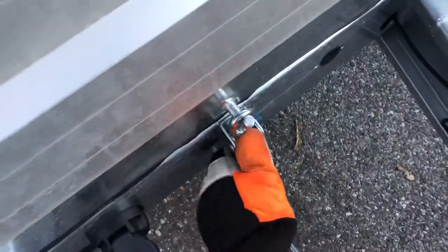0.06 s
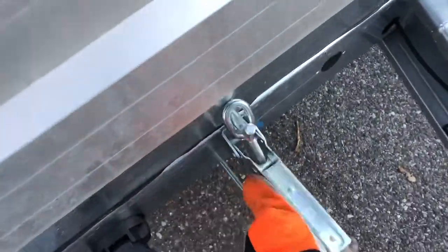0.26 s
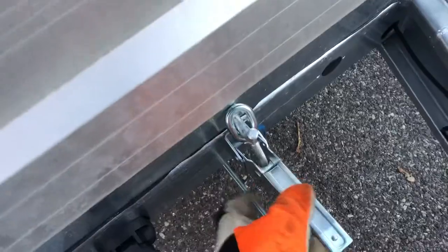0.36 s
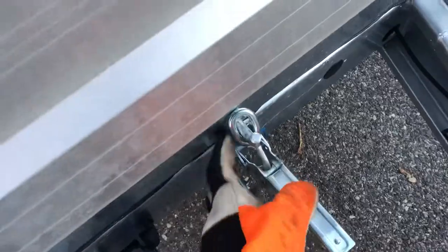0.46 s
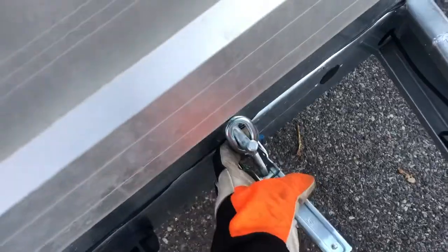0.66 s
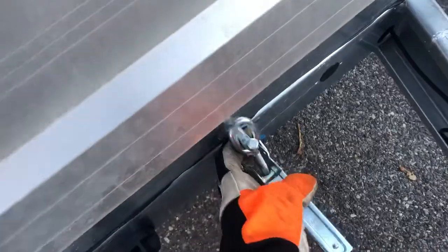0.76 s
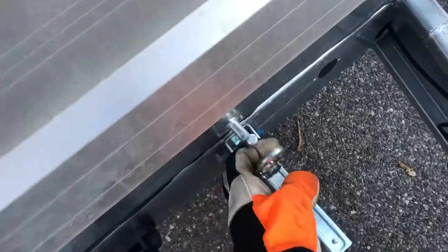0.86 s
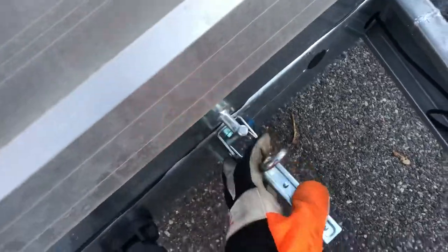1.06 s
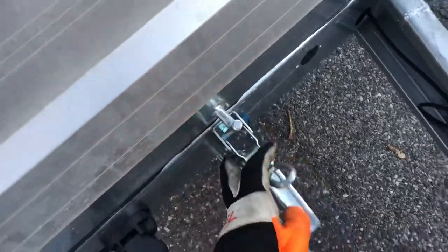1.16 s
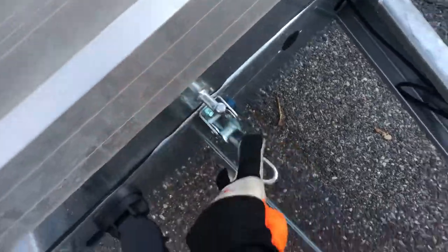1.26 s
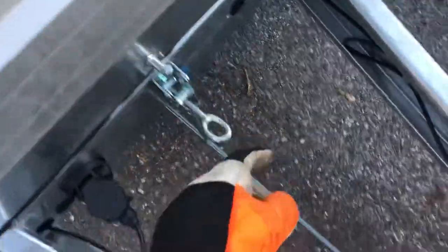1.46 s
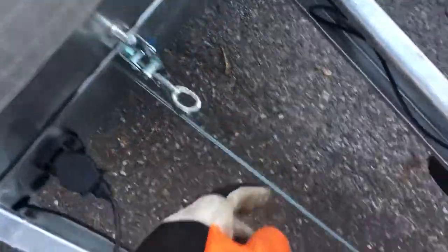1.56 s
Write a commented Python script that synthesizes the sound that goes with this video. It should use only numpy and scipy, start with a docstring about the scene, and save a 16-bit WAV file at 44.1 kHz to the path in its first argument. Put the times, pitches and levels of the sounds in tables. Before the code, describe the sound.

A steel trailer latch snaps open with two loud clanks. After a pause it rattles off its hook, clacks again and drops against the frame. Brief scrapes and soft glove rubbing come between, close by over low outdoor rumble.

```python
"""Over a low outdoor rumble, a steel lever snaps open: a gloved hand undoes a trailer's latch close by.
The over-centre latch's eye knocks on its catch, its shank judders off the hook, and it drops on the frame.
Each blow gives a dense clang and rings both the struck part and the trailer's side.
Steel scrapes around the blows and the glove rubs in between, both as noise from many tiny slips."""
import sys
import numpy as np
from scipy import signal
from scipy.fft import rfft, irfft
from scipy.io import wavfile
from scipy.ndimage import uniform_filter1d

SR = 44100
rng = np.random.default_rng(int(sys.argv[2]) if len(sys.argv) > 2 else 0)


def to_wav(s):
    """Save 16-bit WAV."""
    ch = np.atleast_2d(s).T  # columns
    pcm = np.round(np.clip(ch, -1, 1) * 32767)  # PCM
    wavfile.write(sys.argv[1], SR, pcm.astype(np.int16))


N = 70560


def amp(db):
    """Decibels to gain."""
    return 10 ** (np.asarray(db) / 20)


def unit_rms(x):
    """Scales to rms 1."""
    return x / np.sqrt(np.mean(abs(x) ** 2) + 1e-20)


def lookup(table, hz):
    """Interpolates a table on a log-frequency axis."""
    table_hz, values = np.transpose(table)
    return np.interp(np.log(hz + 1), np.log(table_hz + 1), values)


def colour(x, spectrum):
    """Filters by a spectrum table; output at rms 1."""
    gain = amp(lookup(spectrum, np.fft.rfftfreq(len(x), 1 / SR)))
    return unit_rms(irfft(rfft(x) * gain, len(x)))


# air and rumble spectra (frequency [Hz], relative density [dB])
AIR_SPECTRUM = [(25, -50), (60, -16), (120, -2.5), (200, -0.5), (300, -8.5), (500, -22), (1000, -22.5),
                (2000, -31.5), (4000, -44.5), (8000, -49.5), (15500, -53)]
RUMBLE_SPECTRUM = [(22, -58.5), (32, -20), (45, -4), (65, -8), (120, -33), (1000, -86)]
# rumble envelope (time [s], relative level [dB])
RUMBLE_SWELL = [(0, -16), (.25, -5.5), (.9, 0.5), (1.0, 7), (1.12, 3.5), (1.25, -4.5), (1.499, 3.5),
                (1.6, -0.5)]

def outdoors(air_db=-43.5, rumble_db=-50):
    """Steady open air and a deep, swelling rumble."""
    swell_db = np.interp(np.arange(N) / SR, *np.transpose(RUMBLE_SWELL))
    air = amp(air_db) * colour(rng.standard_normal(N), AIR_SPECTRUM)
    rumble = amp(rumble_db + swell_db) * colour(rng.standard_normal(N), RUMBLE_SPECTRUM)
    return air + rumble


def friction(strokes, spectrum, slips_per_s, spread_db, slip_s=0.00071):
    """Tiny uneven slips, each a puff of noise, in strokes that swell and fade."""
    t = np.arange(N) / SR
    onsets = rng.random(N) < slips_per_s / SR
    slips = onsets * amp(spread_db * np.minimum(rng.exponential(1, N), 3))
    slip_power = signal.lfilter([1], [1, -np.exp(-1 / (slip_s * SR))], slips ** 2)
    envelope = sum(amp(db) * np.sin(np.pi / 2 * np.interp(t, [start, peak, end], [0, 1, 0])) ** 2
                   for start, peak, end, db in strokes)
    return envelope * colour(np.sqrt(slip_power) * rng.standard_normal(N), spectrum)


# glove strokes (start [s], peak [s], end [s], level [dB])
GLOVE_STROKES = [(.53, .645, .80, -46), (1.06, 1.12, 1.47, -51), (1.15, 1.25, 1.48, -42.5)]
# rub spectrum (frequency [Hz], relative density [dB])
GLOVE_SPECTRUM = [(200, 3), (600, 1.5), (1400, -10), (2600, -14.5), (7000, -22.5), (10000, -29),
                  (15500, -29.5)]

def glove_rubs():
    """Glove on the latch: dense slips blur into a soft rustle."""
    return friction(GLOVE_STROKES, GLOVE_SPECTRUM, slips_per_s=6300, spread_db=3.5)


# steel strokes (start [s], peak [s], end [s], level [dB])
STEEL_STROKES = [(.185, .206, 0.29, -28), (.32, .37, 0.35, -31.5), (.828, .886, 0.94, -36)]
# scrape spectrum (frequency [Hz], relative density [dB])
STEEL_SPECTRUM = [(60, -34), (150, -17), (400, -6.5), (850, -8), (1600, -11.5), (3200, -20.5), (5500, -36),
                  (8000, -31.5), (11000, -53), (15500, -56)]

def steel_scrapes():
    """Steel sliding on steel: sparser slips sound gritty."""
    return friction(STEEL_STROKES, STEEL_SPECTRUM, slips_per_s=1400, spread_db=1.0)


def attack(t, hz, rise_s, lag_cycles=0.43):
    """Build-up of a vibration, slower at low frequencies."""
    return 1 - np.exp(-(t / (rise_s + lag_cycles / hz)) ** 2)


def ring(modes, t, rise_s):
    """Decaying sines of a struck object, in random phase."""
    return sum(amp(db - 60 * t / t60_s) * attack(t, hz, rise_s)
               * np.sin(2 * np.pi * (hz * t + rng.random())) for hz, db, t60_s in modes)


# side and frame modes (frequency [Hz], relative level [dB], t60 [s])
TRAILER_MODES = [(95.5, -37.5, 0.79), (120.1, -32, 0.68), (133.7, -30, 0.66), (178.3, -33.5, 1),
                 (223.3, -35, 0.81), (318.4, -25.5, 0.43), (391, -29.5, 0.61), (633.5, -40.5, 1),
                 (883, -35, 0.67)]

def trailer_ring(t, rise_s):
    """The trailer's side and frame ring low and long after a blow."""
    return ring(TRAILER_MODES, t, rise_s)


# modes per part (frequency [Hz], relative level [dB])
PART_MODES = { "lever": [(176, -11.5), (285, -18.5), (372, -14), (480, -20.5), (660, -11.5), (762, -12.5),
              (1022, -16.5), (1250, -19), (1722, -20), (2345, -19), (2620, -32.5), (3470, -14.5),
              (3570, -18.5), (6653, -20), (7154, -19.5)], "pin": [(6277, -14), (7047, -30), (7418, -26),
              (7617, -24), (8183, -27), (11950, -31), (12980, -27), (13950, -38)], "catch": [(180, -17.5),
              (310, -15), (378, -15.5), (545, -18.5), (680, -14.5), (775, -7), (845, -22), (1050, -19),
              (1528, -20.5), (1725, -17), (3925, -21.5), (4920, -18.5), (7200, -22.5), (7620, -12.5),
              (8640, -13.5)], "shank": [(689, -15), (780, -15), (1060, -29), (1523, -24.5)],
              "hook": [(380, -23.5), (680, -25), (812, -25), (1023, -16.5), (1240, -27), (1771, -32.5),
              (2705, -34), (3020, -29), (3305, -30.5), (3700, -30.5), (4474, -28.5), (5227, -34),
              (7060, -32), (7690, -31)], "hinge": [(355, -23), (405, -22.5), (727, -23), (894, -20.5),
              (1039, -32), (1318, -22), (1442, -23.5), (1540, -26.5), (1900, -26.5), (2384, -24.5),
              (3090, -20), (3490, -23.5), (3816, -26), (4317, -25.5), (6940, -17.5), (11270, -30.5),
              (12690, -27)], "eye": [(290, -12.5), (314, -15.5), (522, -11), (606, -17), (694, -13),
              (800, -20.5), (898, -23), (1120, -20), (1310, -23.5), (1911, -21), (2368, -21), (3130, -17.5),
              (4345, -17.5)], }
# low-frequency decay per part (base t60 [s])
PART_T60_S = {"lever": 0.14, "pin": 0.115, "catch": 0.12, "shank": 0.14, "hook": 0.22, "hinge": 0.2, "eye":
              0.25}
# lightly damped modes per part (frequency [Hz], relative level [dB], t60 [s])
SINGING_MODES = {"catch": [(1229, -27, 0.55)]}

def part_ring(part, t, rise_s, decay_scale, damping_hz=3130):
    """The struck part's own modes; one at damping_hz dies twice as fast as the lowest."""
    t60_s = decay_scale * PART_T60_S[part]
    modes = [(hz, db, t60_s / (1 + hz / damping_hz)) for hz, db in PART_MODES[part]]
    return ring(modes + SINGING_MODES.get(part, []), t, rise_s)


# clang spectrum per part (frequency [Hz], relative density [dB])
CLANG_SPECTRA = { "lever": [(35, -30), (60, -6), (180, 6.5), (550, -13.5), (1250, -5.5), (1600, -22.5),
                 (3500, -18), (5000, -22.5), (15500, -31)], "pin": [(150, -14), (700, -10.5), (4500, -6.5),
                 (7500, -14), (10000, -16.5), (15500, -23)], "catch": [(60, -35), (150, -10), (800, -0.5),
                 (1500, -7.5), (2600, -16), (4400, -5.5), (5700, -16.5), (8400, -7.5), (10300, -21),
                 (15500, -21.5)], "shank": [(150, -10), (700, 2), (2400, -16.5), (5000, -39), (15500, -51)],
                 "hook": [(70, -35), (350, 2), (1050, 8), (1500, -11.5), (4600, -6.5), (5700, -18.5),
                 (8300, -13), (10000, -38), (15500, -42)], "hinge": [(100, -22.5), (380, 0), (850, -0.5),
                 (1150, -8.5), (3700, -5.5), (5600, -12.5), (8500, -13), (15500, -33.5)],
                 "eye": [(100, -44), (310, 2.5), (680, -1), (1200, -11.5), (3200, -11), (5500, -20),
                 (8500, -24), (10800, -18.5), (15500, -31)], }
# clang tail decay (frequency [Hz], base t60 [s])
TAIL_T60_S = [(100, 0.69), (300, 0.38), (800, 0.4), (1900, 0.26), (4500, 0.13), (8000, 0.11), (14000, 0.11)]
CRACK_T60_S, CRACK_DAMPING_HZ, TAIL_DB = 0.047, 9000, -9
ECHO_DB, ECHO_T60_S = -42.5, 0.78

def clang(part, t, rise_s, tilt_db_per_octave, decay_scale):
    """Modes too dense to tell apart: per band a short crack, a tail and a faint yard echo."""
    hz = np.fft.rfftfreq(len(t), 1 / SR)
    spectrum = amp(lookup(CLANG_SPECTRA[part], hz))
    spectrum /= np.linalg.norm(spectrum)
    spectrum *= amp(tilt_db_per_octave * np.log2((hz + 1) / 2000))
    edges_hz = np.geomspace(45, 17000, 16)
    phases = np.exp(2j * np.pi * rng.random(len(hz)))
    echo = amp(ECHO_DB - 60 * t / ECHO_T60_S)
    out = np.zeros(len(t))
    for low_hz, high_hz in zip(edges_hz, edges_hz[1:]):
        band = spectrum * ((hz >= low_hz) & (hz < high_hz))
        centre_hz = np.sqrt(low_hz * high_hz)
        noise = unit_rms(np.fft.ifft(band * phases, len(t)))
        local_power = uniform_filter1d(abs(noise) ** 2, size=400) / 2
        even_noise = noise.real / np.sqrt(local_power + 0.034)
        crack = amp(-60 * t / CRACK_T60_S * (1 + centre_hz / CRACK_DAMPING_HZ))
        tail = amp(TAIL_DB - 60 * t / (decay_scale * lookup(TAIL_T60_S, centre_hz)))
        decay = np.sqrt(crack ** 2 + tail ** 2 + echo ** 2)
        out += np.linalg.norm(band) * even_noise * decay * attack(t, centre_hz, rise_s)
    return out


# blows (time [s], part, clang gain [dB], part ring gain [dB], trailer ring gain [dB],
#        base rise [s], clang tilt [dB/octave], decay scale [ratio])
LATCH_BLOWS = [ (0.1703, "pin", -64, -64, -60, 0.001, 10.5, 3.9),
               (0.1989, "lever", -12.5, -28, -24, 0.0024, 3.5, 0.63),
               (.2040, "lever", -5.5, -1, -1.5, 0.00039, 0.5, 0.82),
               (.2300, "hinge", -20, -21, -27.5, 0.00051, -4.5, 0.98),
               (0.2586, "pin", -20, -7, -6, 0.001, -4, 1.23),
               (0.321, "lever", -41, -41.5, -44, .001, 2.5, 0.72),
               (0.356, "hinge", -17.5, -16, -23.5, 0.0021, -2.4, 0.92),
               (0.382, "catch", -6.5, 1, -1.5, 0.00016, -0.14, 0.97),
               (0.8661, "shank", -23, -9, -25, 0.0018, 0.5, 1.75),
               (0.881, "shank", -17.5, -14.5, -36, 0.0017, -0.5, 0.88),
               (0.892, "shank", -21.5, -6, -14, 0.00094, 0, 0.8),
               (.9040, "hook", -16, 0, -15.5, 0.00047, 5.5, 1.15),
               (1.02, "hinge", -23, -7, -20, 0.00083, 4, 0.78),
               (1.0246, "hinge", -15, -5, -18.5, 0.0005, -0.03, 0.79),
               (1.3401, "pin", -19.5, -33, -46, 0.0001, 1, 0.23),
               (1.3410, "eye", -8.5, -3, -8, 0.00019, 0, 0.81),
               (1.4818, "lever", -31.5, -36, -47, 0.00076, -1.5, 0.09), ]

def latch():
    """Steel hits steel: each blow excites the part's modes, a clang and the trailer."""
    out = np.zeros(N)
    t = np.arange(32768) / SR
    for time_s, part, clang_db, ring_db, trailer_db, rise_s, tilt, decay_scale in LATCH_BLOWS:
        blow = amp(ring_db) * part_ring(part, t, rise_s, decay_scale)
        blow += amp(clang_db) * clang(part, t, rise_s, tilt, decay_scale)
        blow += amp(trailer_db) * trailer_ring(t, rise_s)
        start = round(time_s * SR)
        out[start:start + len(blow)] += blow[:N - start]
    return out


def scene():
    """All sources at one microphone."""
    return (steel_scrapes() + glove_rubs() + latch() + outdoors())[None]


def record(dry, ceiling=0.98, cutoff_hz=15900):
    """Soft peak limiter, then low-pass."""
    limited = dry / (1 + (dry / ceiling) ** 4) ** (1 / 4)
    lowpass = signal.firwin(255, cutoff_hz, window=("kaiser", 9), fs=SR)
    return signal.oaconvolve(limited, lowpass[None], "same")


dry = scene()
out = record(dry)
to_wav(out)
```